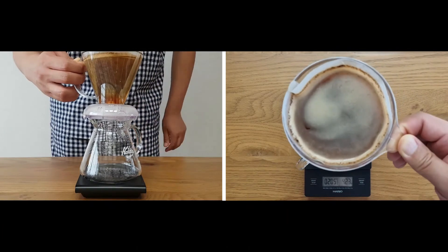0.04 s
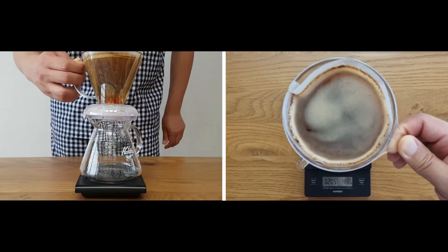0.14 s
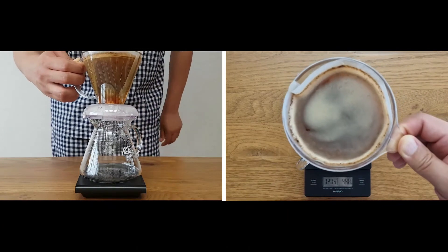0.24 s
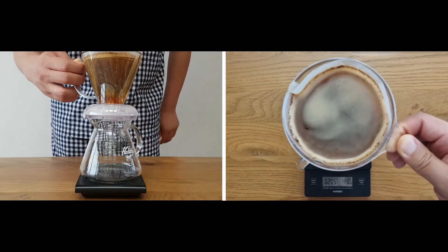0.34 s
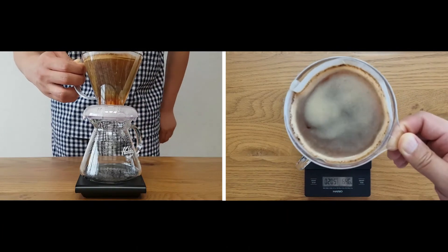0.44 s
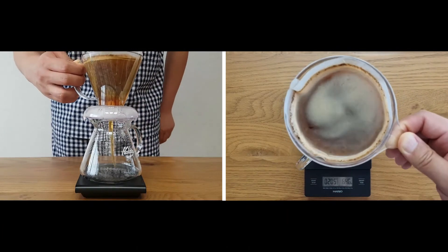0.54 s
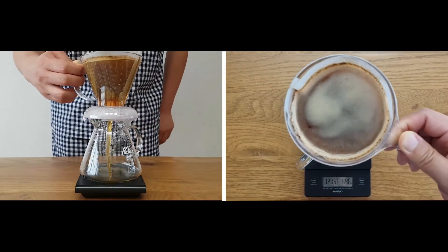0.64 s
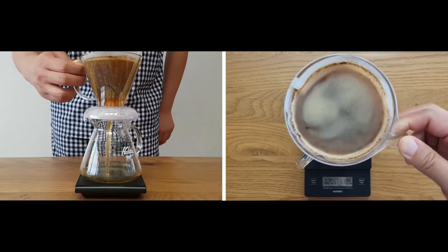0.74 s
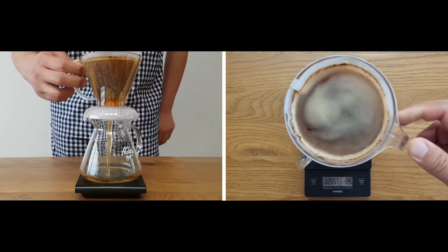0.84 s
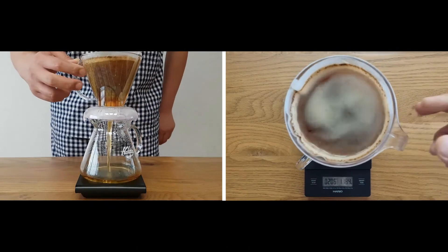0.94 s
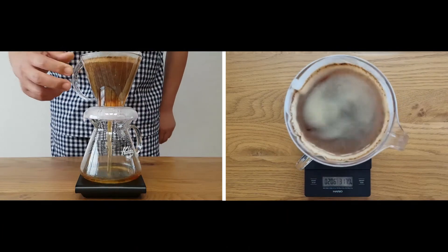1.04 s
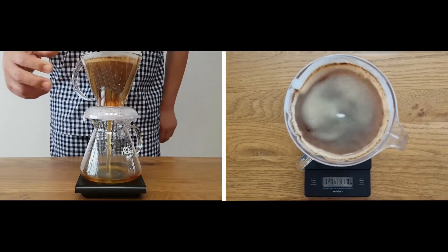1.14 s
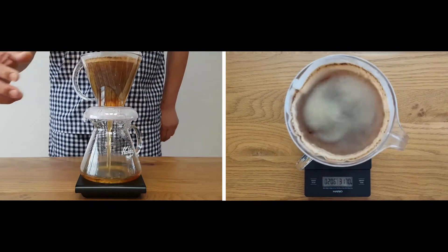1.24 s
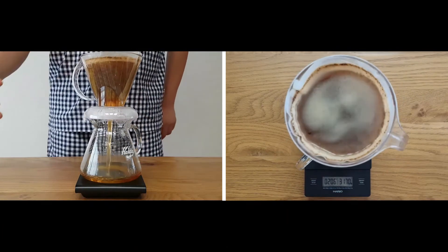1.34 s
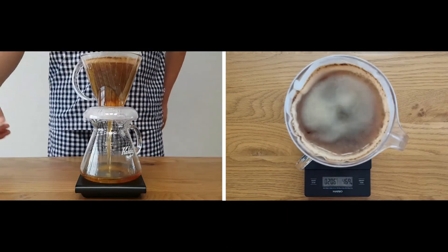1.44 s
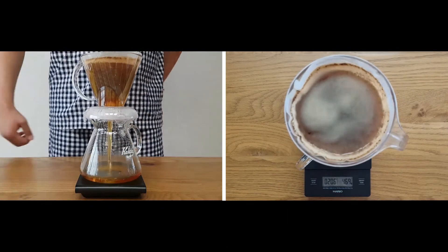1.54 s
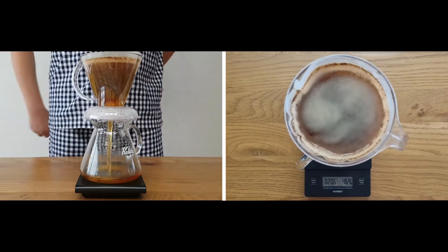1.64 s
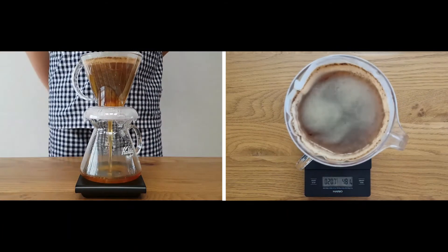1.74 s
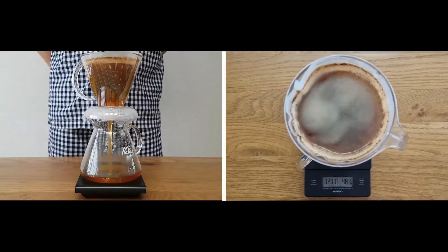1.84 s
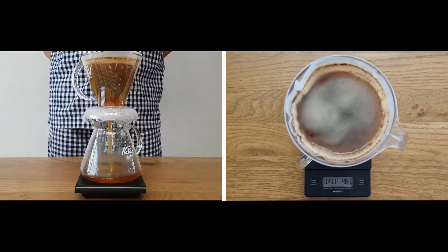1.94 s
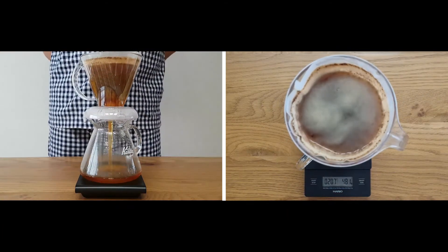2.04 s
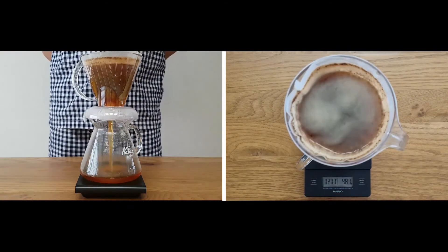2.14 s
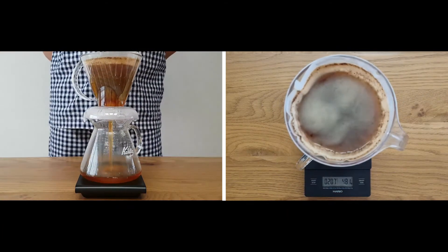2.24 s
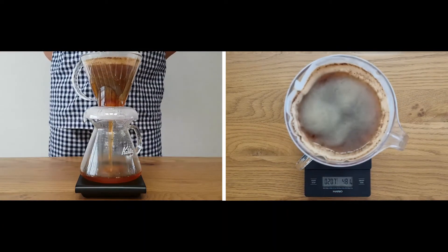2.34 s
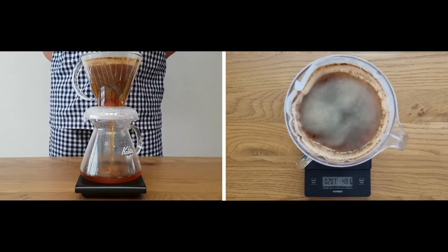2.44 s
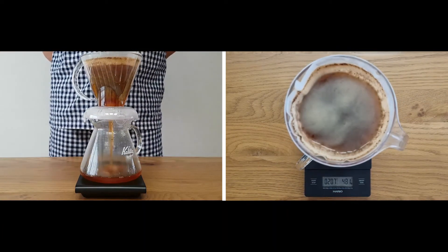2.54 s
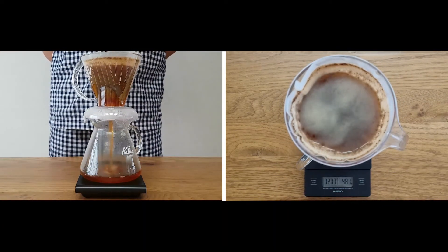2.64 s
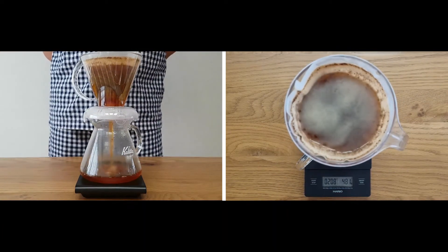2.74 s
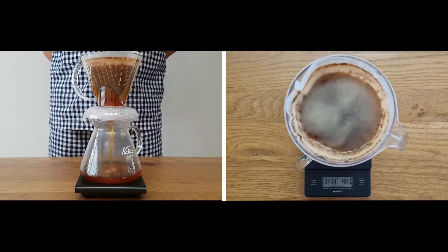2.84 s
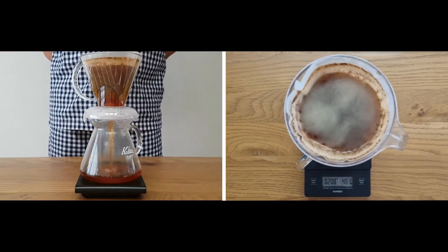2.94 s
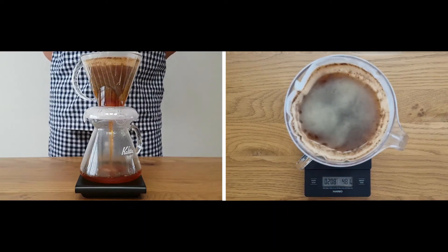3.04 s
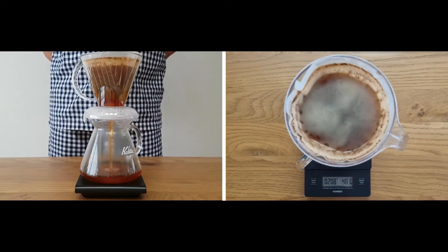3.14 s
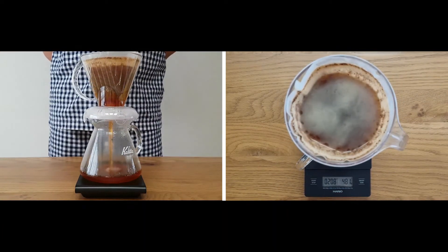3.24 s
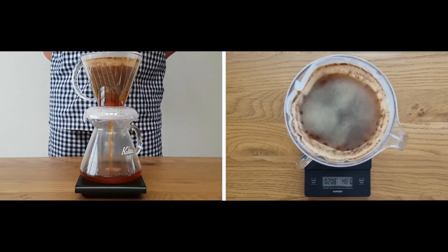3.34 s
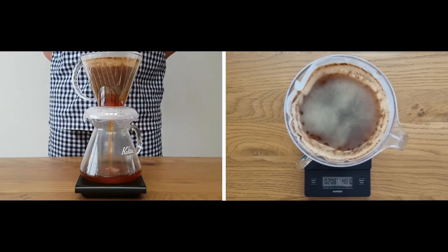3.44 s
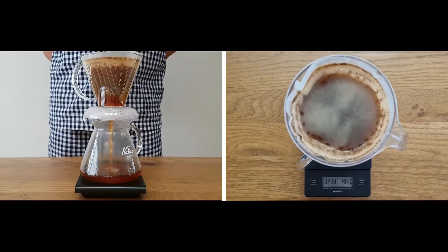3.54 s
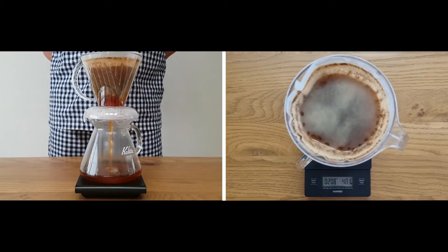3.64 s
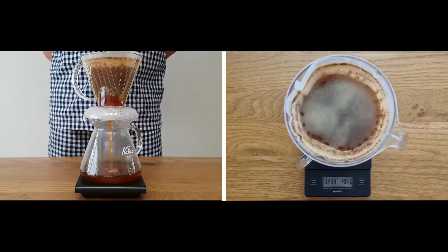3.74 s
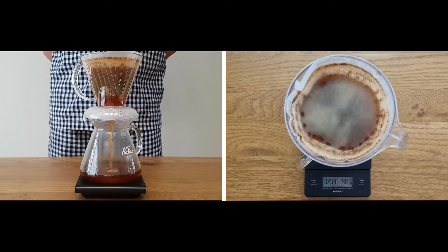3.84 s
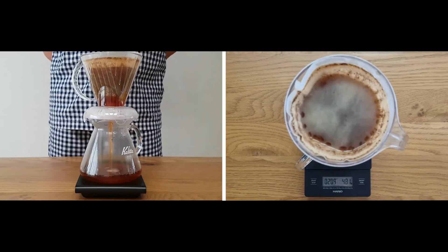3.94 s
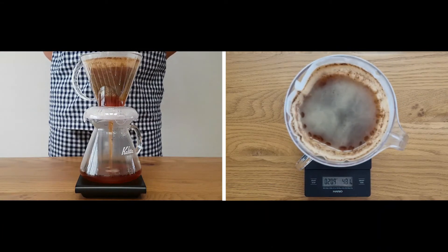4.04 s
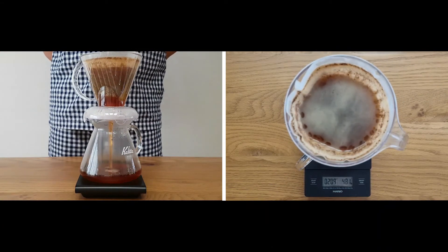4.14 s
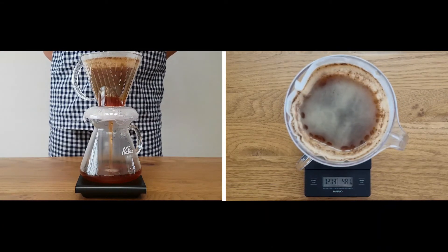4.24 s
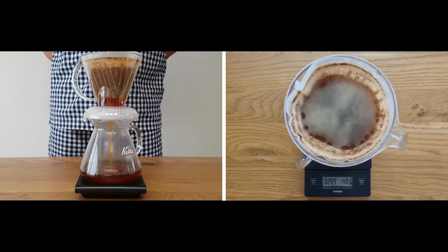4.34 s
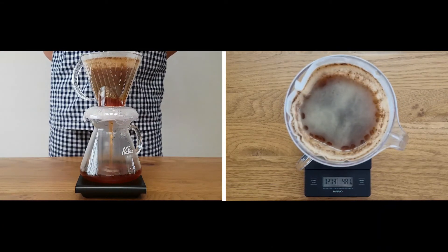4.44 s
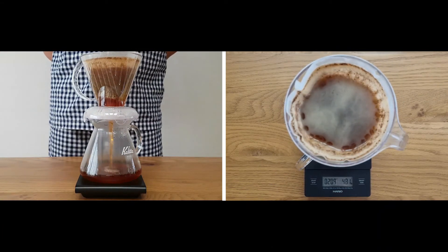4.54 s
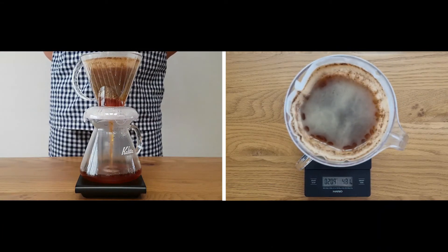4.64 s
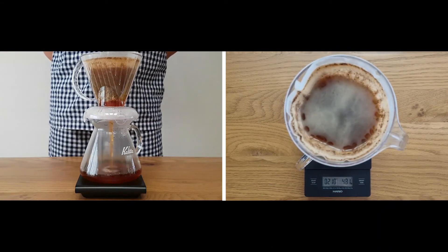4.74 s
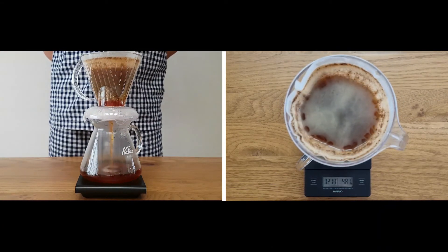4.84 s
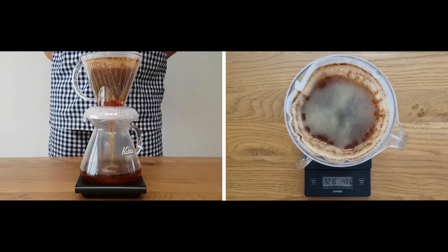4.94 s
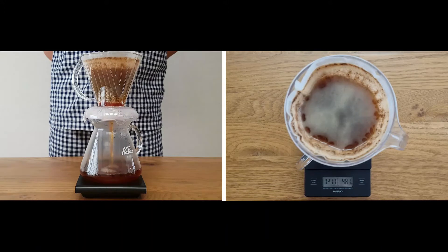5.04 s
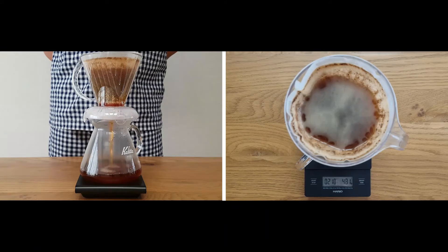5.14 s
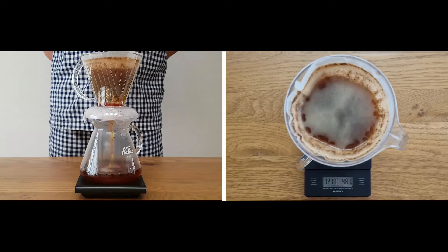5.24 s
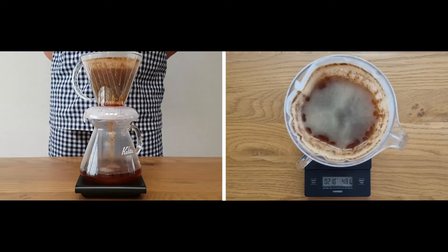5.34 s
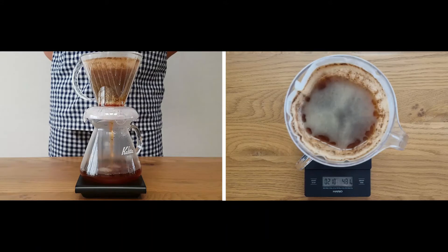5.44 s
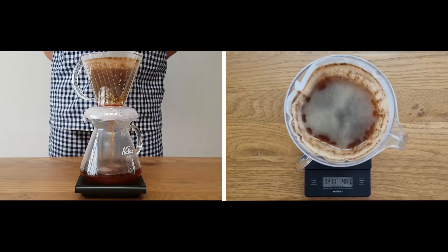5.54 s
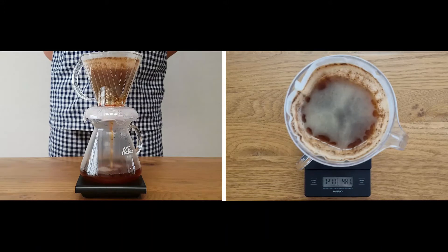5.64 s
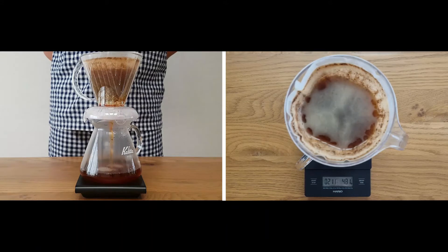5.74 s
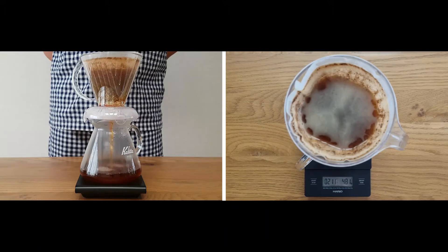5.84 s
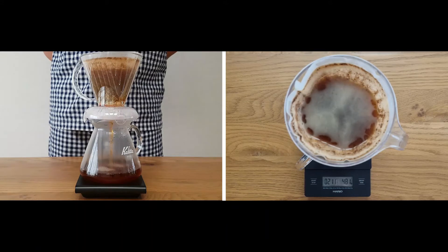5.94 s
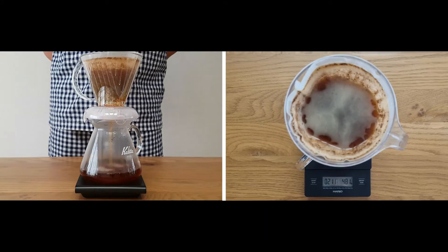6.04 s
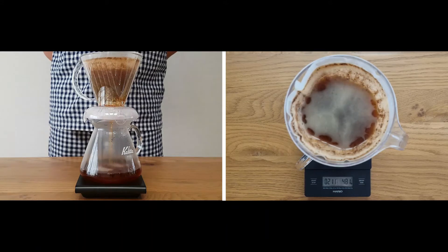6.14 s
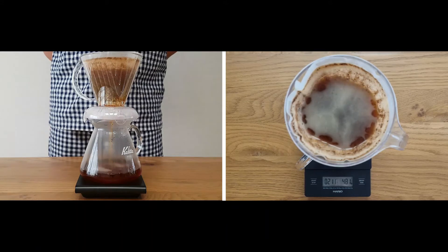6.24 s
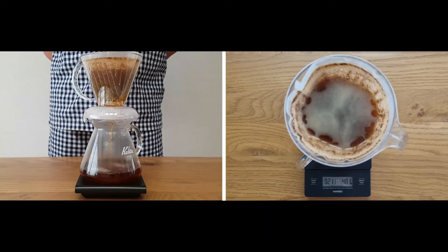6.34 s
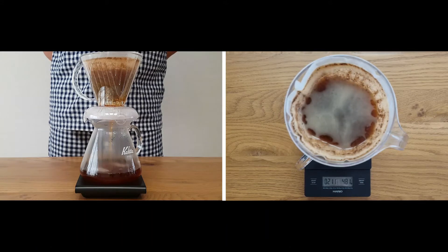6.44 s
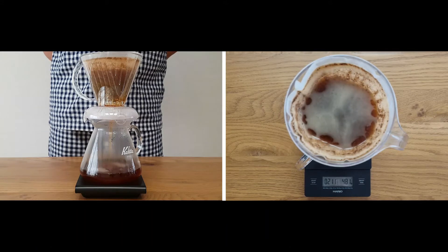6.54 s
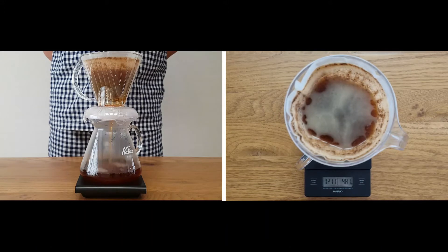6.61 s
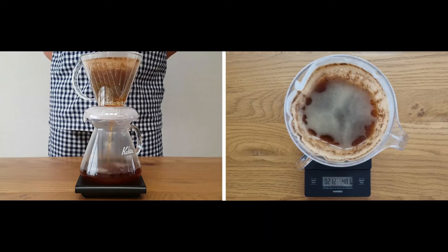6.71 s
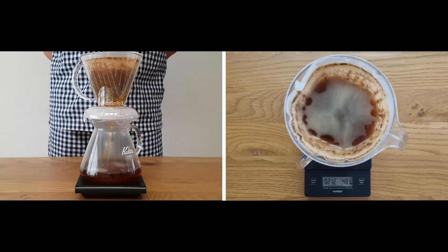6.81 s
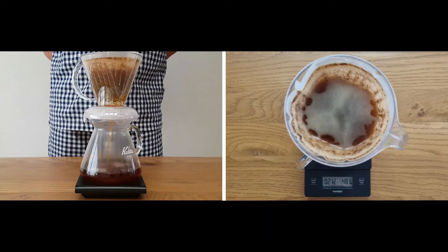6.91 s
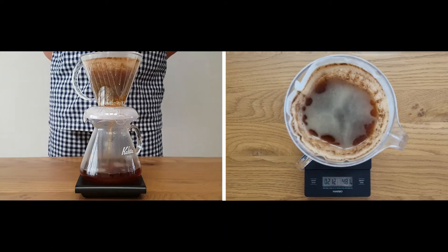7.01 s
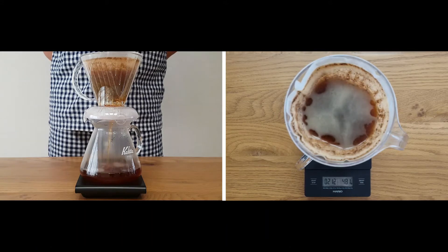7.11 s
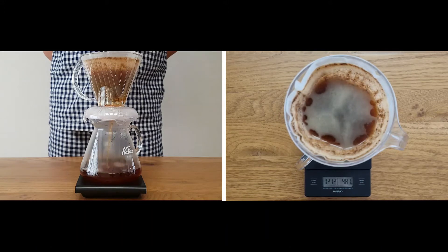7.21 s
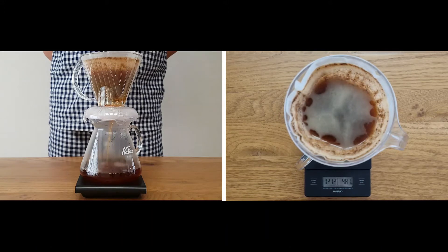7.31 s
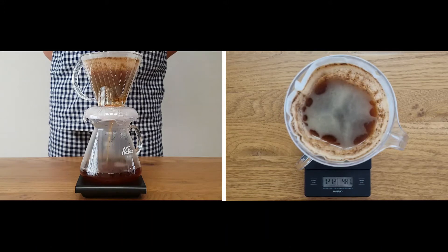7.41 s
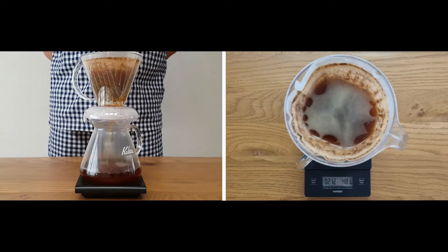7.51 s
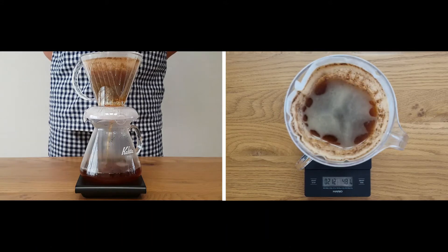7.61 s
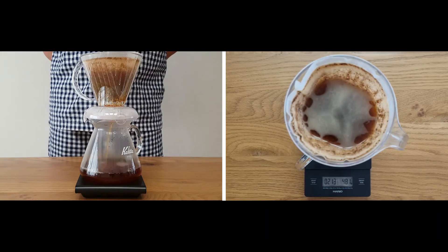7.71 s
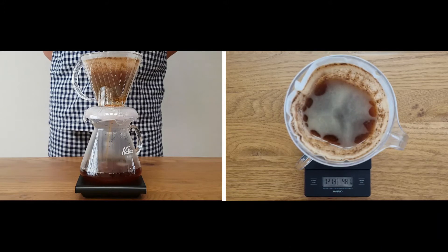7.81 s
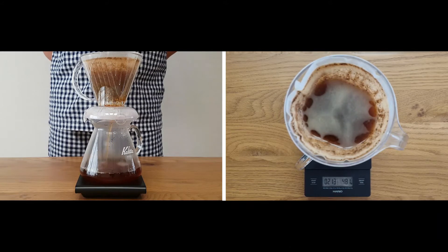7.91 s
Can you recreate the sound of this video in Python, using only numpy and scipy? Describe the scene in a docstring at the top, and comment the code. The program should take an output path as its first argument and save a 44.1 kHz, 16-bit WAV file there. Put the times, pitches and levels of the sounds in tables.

```python
"""A quiet, bare kitchen with faint mains hum, heard from close by.
A brewer is set down on a glass server with a clack: decaying modes and a crack of noise at each touch.
Its valve opens and coffee runs in: droplets tick on the glass bottom, then bubbles plop in the rising pool.
The drops are short decaying sines and puffs of noise, coloured by the server's resonances.
Dying noise gives the echo; shaped noise, mains lines and a small fan's whine that stops give the floor."""
import sys
import numpy as np
from scipy import signal
from scipy.io import wavfile
from scipy.ndimage import uniform_filter1d

SR = 44100
rng = np.random.default_rng(int(sys.argv[2]) if len(sys.argv) > 2 else 0)


def linear_from_db(decibels):
    """Turn decibels (scalar or array-like) into linear amplitude factors; 0 gives 1."""
    return 10 ** (np.asarray(decibels, float) / 20)


def dump_mix(stems):
    """Bounce the given channels to the path in sys.argv[1] as a 16-bit WAV at rate SR."""
    frames = np.atleast_2d(stems).T  # one column per channel
    limited = np.clip(frames, -1, 1)  # hard clip at full scale
    pcm = np.round(limited * 32767).astype(np.int16)
    wavfile.write(sys.argv[1], SR, pcm)


N = 351477
TIME = np.arange(N) / SR
VALVE_OPENS_S = 1.2
LEAD_S = .2   # brewer and echo start this long before we listen


def stream():
    """Coffee running in: loud plops and ticks over a bed of small bubbles, spray and dry patter."""
    return plops() + ticks() + small_bubbles() + spray() + patter()


def plops():
    """Bubbles caught under the stream, each with a splash, a bigger, lower bubble and a thud on the server."""
    # The louder bubbles. Each row: start in seconds, peak in dB, pitch in Hz, splash in dB against that peak.
    caught = [(1.3039, -59, 2140, -7), (1.6748, -53, 2170, -13), (1.7245, -52, 2690, -16),
              (1.7878, -46.5, 2850, -19), (1.8688, -41, 2210, -7.5), (1.905, -49, 2000, -18),
              (1.9604, -56, 2020, -11), (1.9879, -50, 1930, -4), (2.138, -49.5, 2920, -1),
              (2.173, -49.5, 2880, -4), (2.2453, -51, 1970, -11), (2.2789, -48.5, 1480, -11),
              (2.333, -48.5, 1700, -1), (2.3785, -48, 2820, -16), (2.4008, -46, 1640, -10),
              (2.4179, -49.5, 2610, 0.5), (2.5312, -51, 1710, -11), (2.582, -50, 2730, -1),
              (2.6075, -52.5, 1630, -23), (2.6416, -48.5, 2410, -1), (2.7318, -49.5, 1740, -2),
              (2.7651, -48, 1720, -6), (2.7804, -41.5, 2314, -7), (2.8232, -53.5, 1680, 0),
              (3.0967, -54.5, 1060, 2), (3.1308, -55, 980, -3), (3.1642, -48, 1410, -1),
              (3.255, -56, 1020, 1), (3.327, -51, 2900, -7), (3.4423, -50.5, 1330, -4),
              (3.538, -54.5, 1270, 0), (3.7863, -53, 1450, -11), (3.865, -57, 1160, -16),
              (3.9566, -47.5, 1220, -16), (3.995, -52.5, 1260, -14), (4.1052, -48, 1190, -6),
              (4.133, -51.5, 1190, 1.5), (4.1737, -52, 1160, -8), (4.197, -43, 1180, -5),
              (4.26, -47, 1264, -3.5), (4.3686, -53, 1270, -11), (4.4004, -43, 1215, -9),
              (4.4637, -44, 1263, -7), (4.5456, -35.5, 1210, -13.5), (4.5533, -40, 1240, -7),
              (4.583, -48, 1230, -11), (4.603, -42.5, 1220, -8), (4.6674, -53, 1220, 4),
              (4.7743, -49, 1230, 1.5), (4.807, -43.5, 1200, -8), (4.8191, -46, 1130, -9),
              (4.8439, -49, 1130, -11), (4.8795, -40.5, 1170, -11.5), (4.891, -42, 1250, -14),
              (4.9241, -35, 1154, -13.5), (5.0444, -42.5, 1250, -4), (5.0784, -46, 1170, -1.5),
              (5.1068, -46.5, 1190, -2.5), (5.21, -50, 1150, 3), (5.2249, -35, 1190, -8),
              (5.3092, -45, 1210, -9), (5.3249, -39, 1130, -11), (5.437, -46, 1130, -3),
              (5.4667, -37, 1110, -11), (5.493, -43, 1130, -2), (5.5199, -47, 1110, -11),
              (5.5745, -39, 1105, -6.5), (5.6006, -40, 1110, 1), (5.6196, -30, 1117, -10.5),
              (5.6417, -31, 1147, -21), (5.6507, -37.5, 1160, -7), (5.6932, -40.5, 1130, -6.5),
              (5.7215, -45, 1125, -4), (5.8114, -41.5, 1110, -8.5), (5.8225, -47, 1240, -15),
              (5.842, -39, 1156, -10.5), (5.878, -47.5, 1090, -5), (5.8952, -54, 1120, -5),
              (5.931, -37, 1130, -12), (5.9711, -40, 1210, -13), (5.9794, -41, 1190, -7),
              (6.0062, -41, 1130, -11), (6.0269, -39, 1126, -10.5), (6.0511, -41.5, 1080, -16),
              (6.094, -47.5, 1150, -15), (6.1429, -47.5, 1240, -3.5), (6.1845, -33.5, 1247, -8),
              (6.1946, -31, 1217, -13), (6.2025, -32, 1170, -14), (6.2206, -38, 1107, -9),
              (6.2753, -45.5, 1130, -8), (6.3202, -46.5, 1190, -10), (6.4039, -35, 1125, -12.5),
              (6.4273, -37.5, 1120, -15), (6.4472, -29, 1143, -16), (6.4591, -38.5, 1120, -6),
              (6.4757, -47, 1130, -11), (6.5042, -37, 1140, -8.5), (6.527, -35.5, 1096, -6),
              (6.5658, -52, 1050, -11), (6.6383, -48, 1130, -3.5), (6.6573, -41, 1130, -5.5),
              (6.6755, -43.5, 1130, -2), (6.7163, -43.5, 1250, -16), (6.7722, -40, 1110, -13),
              (6.8166, -33, 1180, -13), (6.867, -52, 1110, -11), (6.9154, -50.5, 1140, 1),
              (6.9636, -47, 1150, -6), (6.9765, -44, 1150, -5), (7.008, -45.5, 1210, -9),
              (7.0375, -44.5, 1130, -2.5), (7.0932, -41.5, 1154, -14), (7.1002, -38.5, 1130, -13),
              (7.1701, -47.5, 1130, -9), (7.196, -38.5, 1115, -10), (7.228, -29, 1092, -5),
              (7.2444, -34, 1170, -18), (7.2669, -39.5, 1230, -11), (7.2873, -46, 1130, -13),
              (7.3032, -44.5, 1130, -8), (7.339, -43, 1170, -20), (7.3507, -41.5, 1094, -14),
              (7.3694, -37, 1150, -22), (7.435, -44, 1135, -14), (7.4489, -47, 1130, -9),
              (7.5148, -37.5, 1713, -11), (7.5401, -31, 1090, -7.5), (7.5796, -34, 1110, -10),
              (7.6151, -35.5, 1120, -8.5), (7.645, -31.5, 1127, -7.5), (7.6659, -30, 1047, -10),
              (7.687, -35.5, 1120, -19), (7.7209, -34, 1096, -10.5), (7.7744, -38, 1090, -3.5),
              (7.7857, -36, 1080, -11), (7.797, -37.5, 1133, -14), (7.8514, -49, 1140, -9),
              (7.8835, -38, 1120, -4.5), (7.9087, -42, 1120, -1.5), (7.9543, -49.5, 1145, 2)]
    s, db, hz, splash_db = np.transpose(caught)
    out = peaked(bubbles(hz, cycles=16.7, rise=.15, size=3500, swell=1.85), s, db)
    tone, strength = rng.random((len(s), 2)).T
    # the big bubbles strengthen by 4.5 dB a second as the pool deepens, to -12.5 +- 7.5 dB at the end
    big_db = db - 12.5 + 7.5 * (2 * strength - 1) - 4.5 * (TIME[-1] - s)
    big_hz = hz * np.interp(tone, [0, 1], (0.738, 0.895))
    out += peaked(bubbles(big_hz, cycles=36.0, rise=0.057, size=3500, swell=2.1), s, big_db)
    # the big bubble's push on the server, heard directly
    thuds = bubbles(363 * (0.74 + 0.5 * tone), cycles=13.0, rise=.05, size=3500)
    out += lay(s, thuds * linear_from_db(big_db - 4)[:, None])
    out += peaked(splashes(len(s), 1400, 2470, 0.032, size=3500), s, db + splash_db)
    return out


def ticks():
    """Droplets bursting: a high, short sine and a brighter puff of noise for each."""
    # The louder droplets. Each row: start in seconds, peak in dB, pitch in Hz.
    droplets = [(1.252, -57, 3700), (1.2935, -53.5, 4620), (1.4386, -51.5, 4080), (1.4705, -46.5, 4700),
                (1.5071, -52, 5240), (1.5371, -55, 6760), (1.5371, -44.5, 4980), (1.6508, -47.5, 8350),
                (1.6887, -58, 4330), (1.732, -55, 7650), (1.783, -55, 4600), (1.7964, -45.5, 4370),
                (1.8339, -52, 4400), (1.989, -51, 4660), (2.0944, -56, 7650), (2.1097, -47, 4700),
                (2.2017, -55, 4330), (2.268, -55, 4540), (2.3228, -54, 7610), (2.3402, -53, 4250),
                (2.377, -51, 4500), (2.4783, -53.5, 3490), (2.5622, -59, 7200), (2.5697, -57, 4750),
                (2.5817, -55, 7400), (2.627, -59, 4040), (2.6702, -49.5, 11400), (2.6997, -56, 5200),
                (2.7194, -49.5, 4110), (2.767, -44, 7260), (2.7822, -47, 4080), (3.787, -54.5, 5130),
                (3.9567, -63, 3200), (4.069, -53.5, 10400), (4.1392, -59, 8100), (4.2075, -58.5, 5370),
                (4.5293, -62, 3750), (4.543, -56, 5100), (4.5594, -49.5, 10000), (4.582, -50, 6300),
                (4.666, -53, 4940), (4.8306, -61, 4930), (4.8787, -54.5, 5900), (4.9223, -53.5, 4930),
                (5.1707, -56, 6800), (5.2083, -54, 5800), (5.2956, -62, 5600), (5.3145, -52.5, 6540),
                (5.3993, -58, 6380), (5.4264, -55.5, 6500), (5.518, -55.5, 6350), (5.6013, -53, 11500),
                (5.699, -60.5, 6460), (6.026, -53.5, 6000), (6.5024, -59.5, 5200), (6.6794, -59, 3470),
                (6.9096, -53, 6490), (6.9718, -50, 7240), (7.2083, -55.5, 5500), (7.2257, -49, 8400),
                (7.3369, -55, 6600), (7.4142, -60, 3540), (7.45, -53, 4740), (7.5363, -42.5, 8440),
                (7.6526, -53, 6100), (7.721, -57, 8260), (7.7734, -57, 4730), (7.909, -52.5, 4020)]
    s, db, hz = np.transpose(droplets)
    out = peaked(bubbles(hz, cycles=24., rise=.03, size=1500), s, db)
    return out + peaked(splashes(len(s), 2630, 14300, 0.018, size=1500), s, db - 2)


def small_bubbles():
    """Small bubbles churned up by the stream; they grow, so their pitch sinks, as the pool deepens."""
    # How hard the stream churns the coffee. Each row: time in seconds, level of the small bubbles in dB rms.
    churn = [(1.2, -83), (1.6, -87), (1.95, -71), (2.4, -70), (2.8, -70), (3.1, -73.5), (3.85, -71.5),
             (4.2, -69), (4.8, -65), (5.3, -66.5), (5.5, -58.5), (6.0, -61.5), (6.4, -63), (7.15, -60.5),
             (7.5, -69.5), (7.72, -64.5), (7.97, -64)]
    shallow_hz, deep_hz, deepens_at_s, deepens_over_s = 2085, 1170, 2.97, 0.24
    shallow = (1 - np.tanh((TIME - deepens_at_s) / deepens_over_s)) / 2
    return swarm(count=3000, level_db=np.interp(TIME, *np.transpose(churn)),
                 pitch_hz=deep_hz + (shallow_hz - deep_hz) * shallow,
                 octaves=.65, cycles=9., spread_db=2.5, direct_db=-20)


def spray():
    """High droplets that build up on the bare glass until the pool slowly drowns them."""
    start_db, top_db, drowned_db = -77.5, -65.5, -79
    top_s, drowns_s = 1.85, 1.0
    drowned = 1 - np.exp(-np.maximum(TIME - top_s, 0) / drowns_s)
    level_db = np.interp(TIME, [VALVE_OPENS_S, top_s], [start_db, top_db])
    level_db = level_db + drowned * (drowned_db - top_db)
    return swarm(count=2500, level_db=level_db, pitch_hz=np.full(N, 7200.), octaves=.95, cycles=31.0,
                 spread_db=3.5, direct_db=-17.5, rise=0.097)


def patter():
    """Spells of dry patter: very short drops, heard mostly without the server's ring."""
    # Each row: start in seconds, end in seconds, level in dB rms.
    spells = [(1.703, 2.455, -71.5), (3.06, 3.978, -70.5), (4.312, 4.71, -70), (7.3, 7.903, -72.5)]
    edge_db_per_s, rest_db = 63, -87
    level_db = np.full(N, float(rest_db))
    for start, end, db in spells:
        outside_s = np.maximum(np.maximum(start - TIME, TIME - end), 0)
        level_db = np.maximum(level_db, db - edge_db_per_s * outside_s)
    return swarm(count=1200, level_db=level_db, pitch_hz=np.full(N, 1900.), octaves=0.65, cycles=5.1,
                 spread_db=3., direct_db=8)


def swarm(count, level_db, pitch_hz, octaves, cycles, spread_db, direct_db, rise=0.41):
    """Many small drops at random moments, of uneven size and pitch, held to a level that varies with time."""
    when, tone, sign = rng.random((count, 3)).T
    s = VALVE_OPENS_S + when * (TIME[-1] - VALVE_OPENS_S)
    at = (s * SR).astype(int)
    hz = np.clip(pitch_hz[at] * 2 ** (octaves * (2 * tone - 1)), 300, 15000)
    size_db = spread_db * np.minimum(rng.exponential(1, count), 3)
    size_db = size_db + 3 * drift(30)[at]   # neighbours grow and shrink together
    sizes = linear_from_db(size_db) * np.sign(sign - .5)
    drops = bubbles(hz, cycles, rise, size=500, swell=2.1) * sizes[:, None]
    sound = server(lay(s, drops), direct_db, TIME)
    power = uniform_filter1d(sound ** 2, size=SR // 4)   # an even supply over a quarter second
    opening = np.clip((TIME - VALVE_OPENS_S) * 10, 0, 1)
    return linear_from_db(level_db) * sound / np.sqrt(power + 1e-9) * opening


def bubbles(hz, cycles, rise, size, swell=1.6):
    """One row per bubble: a sine that swells for some cycles and dies 60 dB in so many, rising in pitch."""
    turns = np.arange(size) / SR * hz[:, None]
    tone = np.sin(2 * np.pi * turns * (1 + rise * turns / cycles))
    return tone * linear_from_db(-60 * turns / cycles) * (1 - np.exp(-turns / swell))


def splashes(count, low_hz, high_hz, t60, size):
    """One row per splash: a puff of band-passed noise that dies 60 dB in t60 seconds."""
    age = np.arange(size) / SR
    puffs = rng.standard_normal((count, size)) * linear_from_db(-60 * age / t60) * (1 - np.exp(-age / .0008))
    return signal.sosfilt(signal.butter(2, [low_hz, high_hz], "band", fs=SR, output="sos"), puffs)


def peaked(rows, s, db):
    """Each drop, heard through the server, at its own moment and peak."""
    rows = server(rows, -26, s[:, None])
    return lay(s, rows * (linear_from_db(db) / np.abs(rows).max(axis=1))[:, None])


def lay(seconds, rows):
    """Place each row at its moment."""
    out = np.zeros(N + rows.shape[1])
    starts = (np.asarray(seconds) * SR).astype(int)
    np.add.at(out, starts[:, None] + np.arange(rows.shape[1]), rows)
    return out[:N]


def server(x, direct_db, s):
    """Parallel resonances beside sound that escapes them; they change strength as a pool forms."""
    # Air and wall resonances of the server.
    # Each row: pitch in Hz, width in Hz, level in dB over a film of coffee, level in dB over a pool.
    resonances = [(866, 17, -10, -13), (960, 40, -17, -15), (1050, 36, -12, -24), (1106.5, 24, -14, -1),
                  (1140.5, 33, -14.5, 8), (1230, 66, -7.5, -1), (1456, 62, -15, 3.5), (1670, 180, -8.5, -9),
                  (1776, 15, -20, -1), (2193, 180, -17, -5), (2355, 54, -11, -6.5),
                  (2700, 120, -5.5, -10.5), (3490, 110, -17, -9), (4020, 19, -8, -5.5),
                  (4090, 100, -15, -37), (4390, 310, -7.5, -16), (4740, 62, -12, -3.5),
                  (5130, 180, -8.5, -11), (5490, 82, -15, -6), (6350, 760, -23, -9), (7400, 440, -14, -18),
                  (8250, 98, -10.5, -5), (9780, 550, -21.5, -11), (10720, 60, -5.5, -3.5),
                  (11200, 290, -18, -10.5), (12550, 1000, -18, -18)]
    pool = np.interp(s, (2.8, 4.3), [0, 1])   # the pool forms between these seconds
    out = linear_from_db(direct_db) * x
    for hz, width_hz, film_db, pool_db in resonances:
        r = np.exp(-np.pi * abs(width_hz) / SR)
        zeros = [(1 - r * r) / 2, 0, (r * r - 1) / 2]
        poles = [1, -2 * r * np.cos(2 * np.pi * hz / SR), r * r]
        ring = signal.lfilter(zeros, poles, x + 1e-18)
        out = out + linear_from_db(film_db + pool * (pool_db - film_db)) * ring
    return out


def brewer():
    """Each touch strikes every mode anew, duller when soft, and gives a short crack of noise."""
    # Brewer on the server rim; a negative time is a touch that is still ringing.
    # Each row: start in seconds, relative level in dB, contact softness in Hz (weak above it).
    touches = [(-.15, -23.5, 8900), (0.055, -38.5, 346), (0.331, -65, 3900), (0.566, -54, 6000),
               (0.5934, -15, 2080), (0.5947, -18, 12400), (0.6083, -26.5, 12000), (.613, -23, 5070),
               (.621, -21, 7300), (0.647, -61, 3000), (0.782, -35, 1700)]
    # Modes of the brewer. Each row: pitch in Hz, relative level in dB, 60 dB decay in seconds if not seated.
    modes = [(60, -27, .12), (130, -19, .15), (250, -17, .1), (321, -6, .1), (410, -21, .06),
             (1040, -6, .05), (1130, -2, .05), (1240, -3, .05), (1396, -5, .07), (1510, -3, .08),
             (1545, -6, .12), (2080, -8, .25), (2160, -11, .1), (2437, -9.5, .5), (2455, -15, .4),
             (2489, -12, .12), (2880, -15, .08), (3662, -17, .09), (3900, -21, .25), (4323, -19, .09),
             (4630, -18, .12), (5024, -21, .2), (8127, -26, .08)]
    # Spectrum of the crack. Each row: frequency in Hz, relative level in dB per Hz.
    crack_spectrum = [(100, -114), (300, -13), (700, -17), (1200, -14), (1600, -7), (2500, -6.5),
                      (3400, -14), (5000, -12.5), (6300, -17.5), (9000, -9.5), (16000, -25)]
    seated_s, seated_t60_s = .5, .34   # once the brewer sits on the rim, no mode rings longer than this
    out = np.zeros((2, N + int(LEAD_S * SR)))
    age = np.arange(SR // 2) / SR
    crack_size = SR // 8
    chances = rng.standard_normal((len(touches), len(modes)))
    for (s, db, soft_hz), chance in zip(touches, chances):
        at = int((s + LEAD_S) * SR)
        for (hz, mode_db, t60), luck in zip(modes, chance):
            t60 = min(t60, seated_t60_s) if s > seated_s else t60
            gain = linear_from_db(db + mode_db + 2 * luck) / (1 + (hz / soft_hz) ** 3) / 3
            envelope = linear_from_db(-60 * age / t60) * np.minimum(age / 0.00036, 1)
            out[:, at:at + len(age)] += gain * np.sin(2 * np.pi * hz * age + luck) * envelope
        noise = bands(crack_size, lambda hz: linear_from_db(at_hz(crack_spectrum, hz)) / (1 + (hz / soft_hz) ** 3))
        crack = rms_one(noise)
        fade = linear_from_db(db - 10.0 - 60 * age[:crack_size] / 0.12)
        # partly wide, partly centred
        out[:, at:at + crack_size] += fade * (0.53 * crack + 0.31 * crack.mean(axis=0))
    return out


def kitchen(x):
    """Reverberation of the bare room: noise that dies band by band, after a short gap."""
    # Each row: frequency in Hz, 60 dB decay in seconds.
    decay = [(100, 1), (1000, 0.54), (5000, 0.8), (14000, 0.66)]
    age = np.arange(SR * 3 // 4) / SR
    tail = bands(len(age), lambda hz: linear_from_db(-60 * age / at_hz(decay, hz)))
    tail = tail * np.clip((age - .004) / 0.0012, 0, 1)
    tail = tail / np.sqrt(np.sum(tail ** 2) / 2)
    return signal.fftconvolve(x[None], tail, axes=1)[:, :len(x)]


def hush():
    """Room air and microphone hiss: noise whose bands drift slightly in level, at -66.5 dB rms."""
    # Each row: frequency in Hz, relative level in dB per Hz.
    spectrum = [(15, -53), (25, -21), (49, -7.5), (141, -4), (317, -6), (354, -5), (451, -10), (591, -12),
                (840, -17), (1290, -18.5), (3620, -24), (5430, -30.5), (7710, -27.5), (16000, -34)]
    return linear_from_db(-66.5) * rms_one(bands(N, lambda hz: linear_from_db(at_hz(spectrum, hz) + 1.2 * drift(7))))


def hum():
    """Wavering sines: the low mains lines go on, a small fan's whine fades out and stops."""
    # Each row: pitch in Hz, typical level in dB rms.
    lines = [(59.2, -78.5), (118.4, -80), (419.9, -87.5), (452.2, -78.5)]
    fan_stops_s, fade_s = 3.4, 0.72
    out = np.zeros(N)
    for hz, db in lines:
        running = 1 if hz < 200 else np.clip((fan_stops_s - TIME) / fade_s, 0, 1)
        level = np.sqrt(2) * linear_from_db(db + 1.9 * drift(6.2))
        out = out + level * running * np.sin(2 * np.pi * hz * TIME)
    return out


def bands(length, gain):
    """Stereo noise in half-octave bands, each with its own gain(hz) and left-right likeness."""
    # Each row: frequency in Hz, left-right likeness (1 is mono).
    likeness = [(30, 1), (60, 0.98), (125, 0.95), (250, 0.87), (2000, 0.84), (8000, 0.71), (12000, 0.61)]
    out, edges = 0, 22 * 2 ** np.arange(0, 10, .5)
    white = rng.standard_normal((2, 2, length))   # neighbouring bands take turns with two noises
    for k, (low, high) in enumerate(zip(edges, edges[1:])):
        band = signal.butter(2, [low, high], "band", fs=SR, output="sos")
        mid, side = signal.sosfilt(band, white[k % 2])
        hz = np.sqrt(low * high)
        alike = np.clip(at_hz(likeness, hz), 0, 1)
        out = out + gain(hz) * (np.sqrt(1 + alike) * mid + np.sqrt(1 - alike) * side * [[1], [-1]])
    return out


def drift(rate):
    """Slow chance of spread about 1, with so many turning points a second."""
    knots = rng.standard_normal(300)
    return np.interp(TIME * rate, np.arange(len(knots)), knots) * np.sqrt(1.5)


def at_hz(points, hz):
    """Read a spectrum on a log-frequency axis."""
    point_hz, value = np.transpose(points)
    return np.interp(np.log(hz), np.log(point_hz), value)


def rms_one(x):
    """Scale to rms 1."""
    return x / np.sqrt(np.mean(x ** 2) + 1e-20)


def scene():
    """The brewer and the stream close by, their echo in the kitchen, and the floor."""
    lead = int(LEAD_S * SR)   # the room already rings when we start to listen
    clack, water = brewer(), np.pad(stream(), (lead, 0))
    wet = linear_from_db(-10.5) * clack.mean(axis=0) + linear_from_db(-11.0) * water
    close = (clack + water) * linear_from_db(np.array([[.3], [-.3]]))   # slightly left, in dB
    return (close + kitchen(wet))[:, lead:] + hush() + hum()


def band_limit(x):
    """A steep low-pass at the top of the band."""
    return signal.sosfilt(signal.butter(12, 16500, fs=SR, output="sos"), x)


def record(dry):
    """Remove everything above about 16.9 kHz from the stereo mix and finish it."""
    mix = signal.sosfilt(signal.cheby2(12, 50, 16900, fs=SR, output="sos"), dry)
    return band_limit(mix)


dry = scene()
out = record(dry)
dump_mix(out)
```